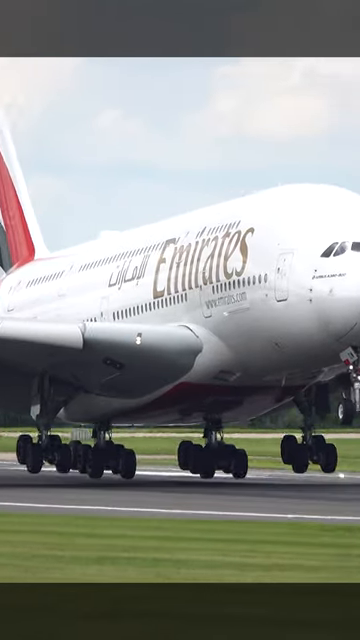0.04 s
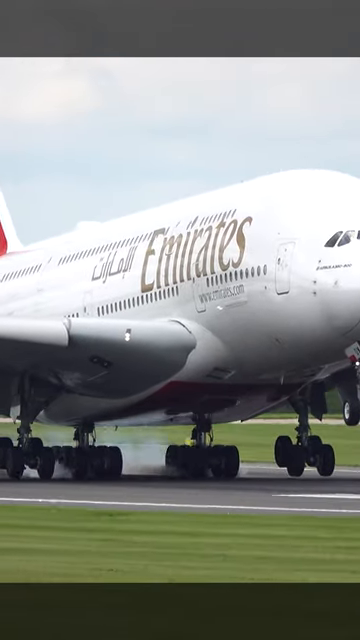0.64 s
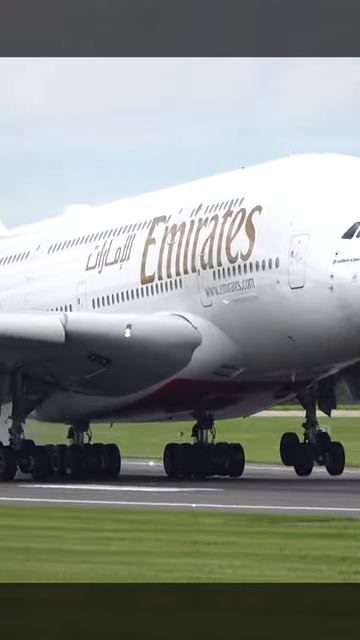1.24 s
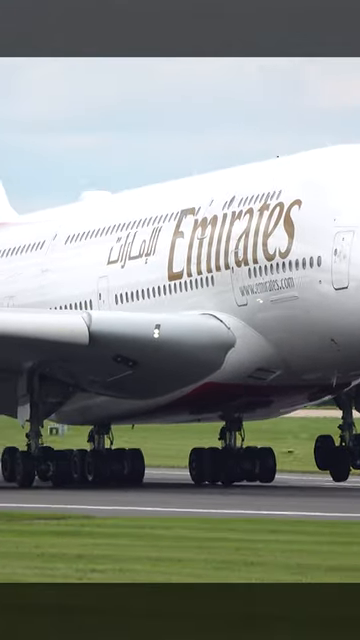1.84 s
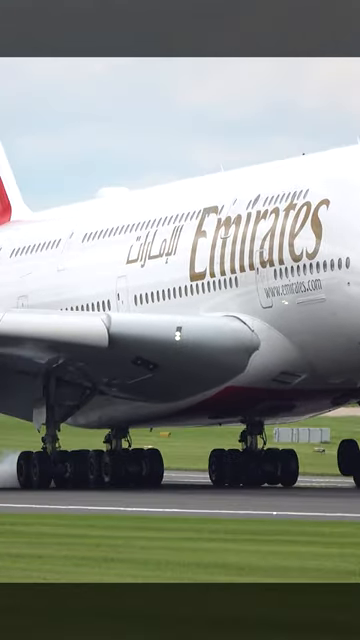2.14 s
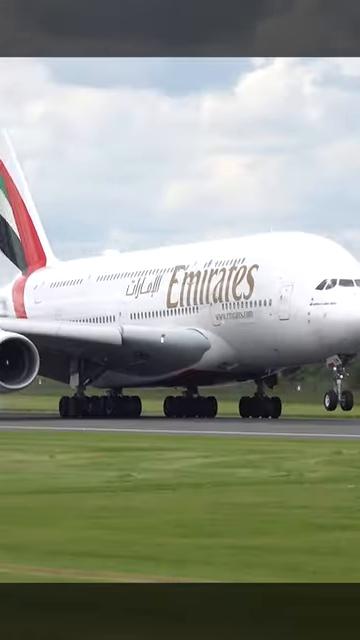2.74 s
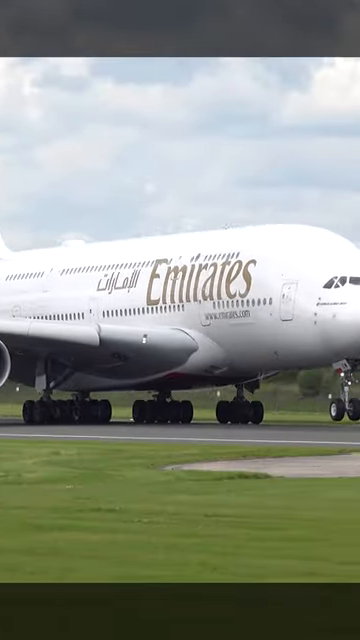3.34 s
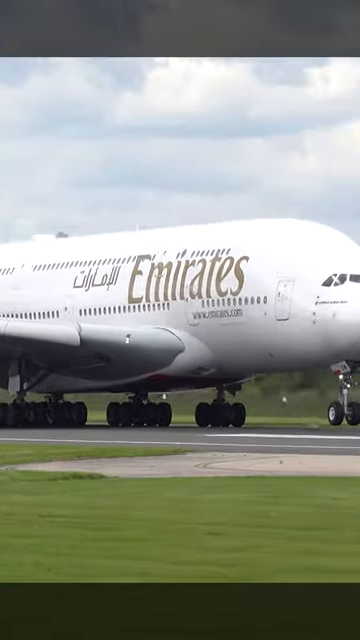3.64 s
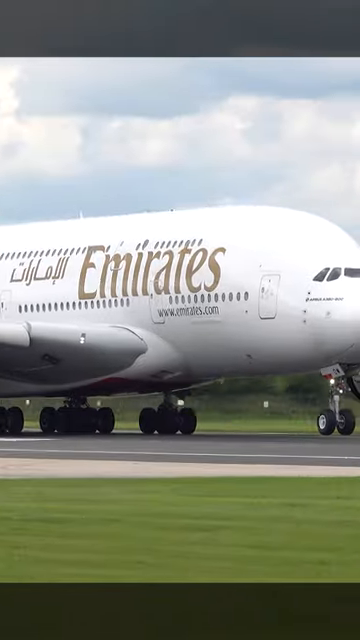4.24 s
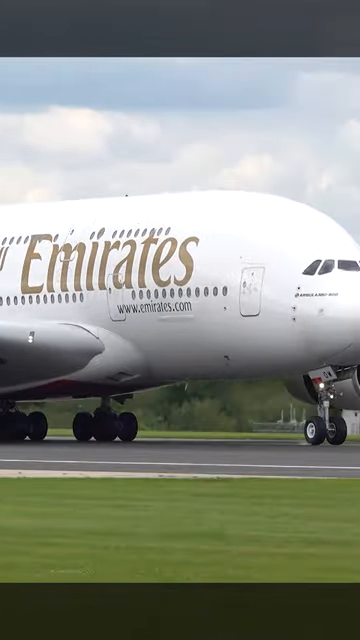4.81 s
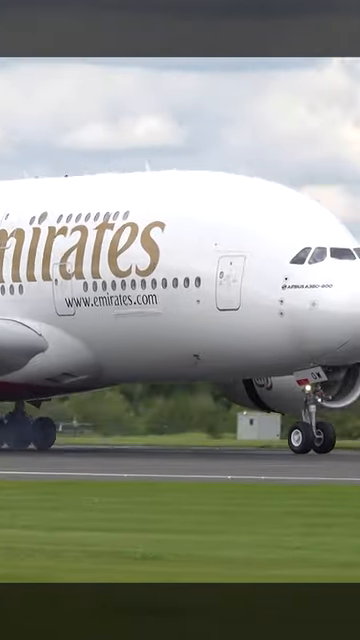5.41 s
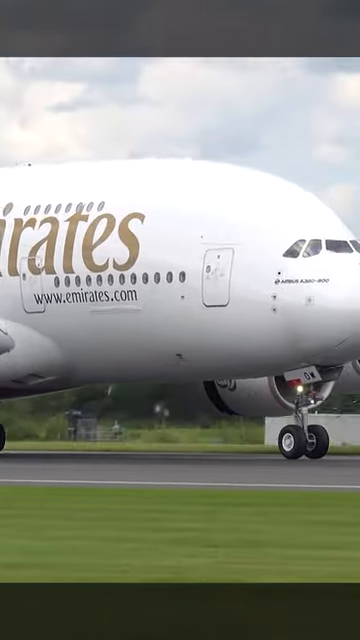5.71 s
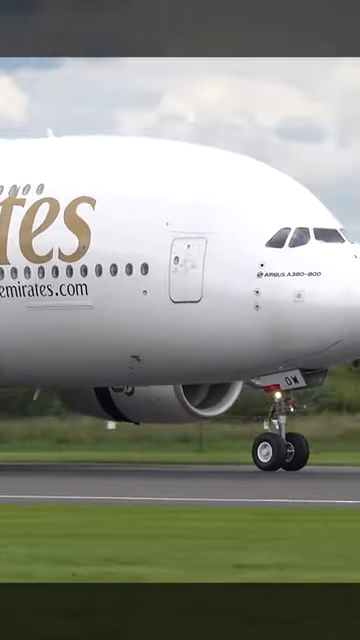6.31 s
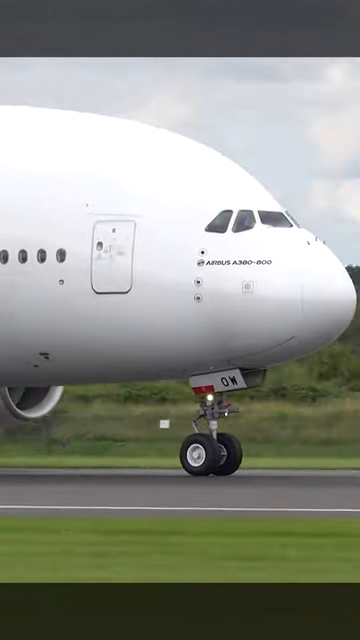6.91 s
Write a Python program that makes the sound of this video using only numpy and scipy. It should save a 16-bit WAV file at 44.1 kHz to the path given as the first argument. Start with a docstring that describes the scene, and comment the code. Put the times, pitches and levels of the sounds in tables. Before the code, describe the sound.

A large jet airliner lands on a runway, heard from across open grass. At first its idling engines whine downward over a low rumble while gusts of wind buffet the microphone. Then reverse thrust builds into a deep roar and a wide rush that brightens as the plane nears. The nose tyres give a brief double rasp, and a few sharp ticks top the loud engine noise.

```python
"""Idling jet fans whine down over a low rumble while gusts of wind buffet the microphone.
A four-engined airliner is landing and rolling closer, heard across grass. Its engines spool up in
reverse thrust: large exhaust eddies swell into a deep roar, and jet turbulence into a wide rush that
brightens as it nears. The nose tyres rasp, sharp ticks top the rush, and the peaks drive a limiter."""
import sys
import numpy as np
from scipy import signal
from scipy.fft import rfft, irfft, next_fast_len
from scipy.io import wavfile
from scipy.ndimage import uniform_filter1d, minimum_filter1d

SR = 44100
rng = np.random.default_rng(int(sys.argv[2]) if len(sys.argv) > 2 else 0)


def to_wav(sig):
    """Store sig (one row per channel, or 1-D mono) as 16-bit WAV at the path in sys.argv[1].

    Samples outside -1..1 are clipped; the rate is SR.
    """
    pcm = np.clip(np.atleast_2d(sig), -1, 1) * 32767
    pcm = np.round(pcm).astype(np.int16)
    wavfile.write(sys.argv[1], SR, pcm.T)  # frames by channels


N = 306936
TIME = np.arange(N) / SR
FRAME, HOP = 1024, 256  # samples
FRAME_S = np.arange(N // HOP + 6) * HOP / SR
BIN_HZ = np.fft.rfftfreq(FRAME, 1 / SR)


def gain_of(db):
    """Decibels to amplitude."""
    return 10 ** (np.asarray(db) / 20)


def unit_rms(x):
    """Scales to rms 1."""
    return x / np.sqrt(np.mean(x ** 2) + 1e-20)


def steadied(x, seconds):
    """Rides the level to hold rms 1 within a sliding window."""
    size = max(int(seconds * SR), 2)
    power = uniform_filter1d(uniform_filter1d(x ** 2, size), size)
    return x / np.sqrt(abs(power) + 1e-20)


def follow(rows, t=TIME):
    """Each column of an automation curve at times t."""
    times, *columns = np.transpose(rows)
    return [np.interp(t, times, column) for column in columns]


def bumps(times, half_lengths, heights, t=TIME):
    """A sum of bell-shaped rises and falls."""
    return sum(h * np.exp(-((t - s) / w) ** 2) for s, w, h in zip(times, half_lengths, heights))


def eq_db(colour, hz):
    """An EQ curve in dB, its points joined on a log-frequency axis."""
    points_hz, db = np.transpose(colour)
    return np.interp(np.log(hz + 1), np.log(points_hz + 1), db)


def noise(colour):
    """Noise of rms 1, shaped by an EQ curve."""
    size = next_fast_len(N)
    hz = np.fft.rfftfreq(size, 1 / SR)
    spectrum = rfft(rng.standard_normal(size)) * gain_of(eq_db(colour, hz))
    return unit_rms(irfft(spectrum, size)[:N])


def varispeed(x, speed):
    """Loops a sound at a changing speed, bending its pitch."""
    return np.interp(np.cumsum(speed), np.arange(N), x, period=N)


def drift(rate_hz):
    """A random wobble of rms 1, with little above the given rate."""
    size = len(FRAME_S)
    hz = np.fft.rfftfreq(size, FRAME_S[1])
    slow = irfft(rfft(rng.standard_normal(size)) / (1 + (hz / rate_hz) ** 2), size)
    return np.interp(TIME, FRAME_S, unit_rms(slow))


def patches(seconds, width_hz):
    """Smooth random blotches over time and frequency, rms 1."""
    field = rng.standard_normal((len(FRAME_S), len(BIN_HZ)))
    over_time = signal.windows.gaussian(len(FRAME_S) // 2, seconds / FRAME_S[1])
    over_pitch = signal.windows.gaussian(len(BIN_HZ) // 2, width_hz / BIN_HZ[1])
    return unit_rms(signal.fftconvolve(field, np.outer(over_time, over_pitch), "same"))


def whine(start, end, first_hz, last_hz, level_db, width_hz, waver=.006, flicker_db=2, fade_s=.055):
    """A gliding tone, smeared into a narrow band by the turbulent air it crosses."""
    hz = np.interp(TIME, [start, end], [first_hz, last_hz]) * (1 + waver * drift(rate_hz=8.34))
    tone = np.exp(2j * np.pi * np.cumsum(hz) / SR)
    low_pass = signal.butter(2, 150, fs=SR)
    scatter = signal.lfilter(*low_pass, drift(width_hz) + 1j * drift(width_hz))
    scatter *= gain_of(flicker_db * drift(rate_hz=8.3))
    outside_s = np.maximum(np.maximum(start - TIME, TIME - end), 0)
    envelope = gain_of(level_db) * np.exp(-outside_s / fade_s)
    return envelope * steadied((tone * scatter).real, seconds=.15)


# Fan blade tones that come through in stretches. Each row: start and end in seconds,
# first and last pitch in Hz, level against the rush in dB, width in Hz.
BLADE_TONES = [(0, 1.298, 1980, 1855, -9, 69), (0, 1.11, 2103, 2068, -11, 70),
               (1.347, 2.053, 1890, 1854, -9, 95), (2.302, 2.55, 1806, 1790, -12, 80),
               (0, 0.334, 3570, 3460, -24.5, 45), (2.68, 3.0, 1705, 1700, -11.5, 75),
               (2.967, 3.17, 3448, 3450, -14, 60), (2.998, 3.447, 2117, 2170, -11, 98),
               (3.17, 3.38, 3530, 3600, -17.5, 45), (3.58, 4.285, 2724, 2815, -13, 80),
               (4.36, 4.62, 2950, 3000, -15.5, 60), (5.147, 6.92, 3330, 3330, -22, 79),
               (5.6, 7, 950, 952, -21, 13)]


def fans():
    """The fans sink to idle, then climb as reverse thrust comes in; their tones grow with the rush."""
    return gain_of(rush_level_db()) * sum(whine(*row) for row in BLADE_TONES)


def distance_m(t, aside_m, speed_m_per_s=72.6, abeam_s=6.94):
    """How far off the engines are, rolling down a straight runway to draw level at abeam_s."""
    return np.hypot(aside_m, speed_m_per_s * (abeam_s - t))


ASIDE_M = 125.5  # from the microphone to the runway
# Idle, then the push into reverse thrust. Each row: time in seconds, rush level at ASIDE_M in dB.
THRUST = [(0, -23.5), (.5, -25), (1.35, -25.5), (2.1, -22), (2.4, -24), (3.58, -20), (3.82, -13.5),
          (4.2, -11), (5.05, -10.5), (5.4, -13.5), (6.25, -12), (6.96, -13)]
# Swells and fades on the way through the air. Each row: centre and half length in seconds,
# change to the rush in dB, change to the roar in dB.
AIR_SWELLS = [(0.507, 0.19, 2, 4), (1.53, .05, -1, 4.5), (4.384, 0.02, 2, -5), (4.744, 0.023, -3.5, 1),
              (5.138, .04, -2, -0.5), (5.41, 0.038, 0.5, 1.5), (5.607, 0.021, 0, 0.5),
              (6.223, .05, 2.5, 0.5), (6.445, 0.027, 1.5, 8)]


def rush_level_db():
    """The fader for the rush: up with thrust, down with distance, nudged by the air."""
    thrust_db, = follow(THRUST)
    spreading_db = 20 * np.log10(distance_m(TIME, ASIDE_M) / ASIDE_M)
    centre_s, half_s, rush_db, _ = np.transpose(AIR_SWELLS)
    return thrust_db - spreading_db + bumps(centre_s, half_s, rush_db)


# The band of the rush that the ground bounce lifts. Each row: time in seconds, centre in Hz, lift in dB.
GROUND_LIFT = [(0, 890, 0), (1.2, 1000, 0), (1.65, 1093, 2.5), (2.2, 1100, -1), (2.6, 600, 0.5),
               (4.1, 680, 1.5), (4.65, 740, 6.5), (5.1, 810, 5.5), (5.3, 826, 1), (5.7, 900, .5),
               (6.1, 865, 5), (6.96, 800, 2)]


def ground_bounce_db(width_octaves=.34, dip_share=.63):
    """Direct and reflected sound add in one broad band and partly cancel an octave below."""
    centre_hz, lift_db = follow(GROUND_LIFT, FRAME_S[:, None])
    octaves = np.log2((BIN_HZ + 1) / centre_hz)
    crest, notch = (np.exp(-.5 * (o / width_octaves) ** 2) for o in (octaves, octaves + 1))
    return lift_db * (crest - dip_share * notch)


# The tone of the jet rush close by. Each row: frequency in Hz, relative level in dB.
RUSH_EQ = [(100, -11), (300, -4.5), (420, -2.5), (580, -1), (1100, -1.5), (1650, -2), (2350, -5.5),
           (3300, -4), (3620, -7), (4050, -18), (4500, -22), (5100, -23), (7000, -36), (9000, -52.5),
           (12000, -69.5)]
# The rush briefly brightens or dulls. Each row: centre and half length in seconds, treble change in dB.
TREBLE_FLARES = [(3.2, 0.36, 3), (3.8, 0.13, 1.5), (5.61, 0.026, -9), (6.227, 0.064, 4), (6.55, 0.021, 5.5)]


def rush(close_m=128, air_db_per_m=.0022, shelf_hz=3500, patchy_db=.85, flutter_db=.5, sway_db=.5):
    """Turbulent jet noise, dulled by the air and made to flutter by eddies on the way."""
    t = FRAME_S[:, None]
    # air absorbs with the square of frequency; air_db_per_m holds at 1 kHz
    absorbed_db = air_db_per_m * (distance_m(t, ASIDE_M) - close_m) * (BIN_HZ / 1000) ** 2
    colour_db = eq_db(RUSH_EQ, BIN_HZ) - absorbed_db + ground_bounce_db()
    treble_shelf = BIN_HZ ** 2 / (BIN_HZ ** 2 + shelf_hz ** 2)
    colour_db += bumps(*np.transpose(TREBLE_FLARES), t) * treble_shelf
    colour_db += patchy_db * patches(seconds=.017, width_hz=95)
    real, imag = rng.standard_normal((2,) + colour_db.shape)
    spectra = (real + 1j * imag) * gain_of(colour_db)
    jet = signal.istft(spectra.T, nperseg=FRAME, noverlap=FRAME - HOP)[1][:N]
    eddies_db = flutter_db * drift(rate_hz=58) + sway_db * drift(rate_hz=22)
    return gain_of(rush_level_db() + eddies_db) * steadied(jet, seconds=.36)


# The bed of breeze on the microphone. Each row: time in seconds, level in dB.
BREEZE = [(0, -32), (1.55, -29), (1.8, -37), (2.2, -30.5), (5.2, -32), (5.9, -42), (6.96, -43)]
# Gusts on top of the breeze. Each row: centre and half length in seconds, lift in dB.
GUSTS = [(.49, 0.052, 7.5), (0.946, 0.026, 12), (1.283, 0.084, 12), (2.13, 0.14, 9), (2.421, 0.1, 5.5),
         (3.063, 0.27, 8), (4.001, 0.061, 7), (5.068, 0.065, 8.5)]
# The wind's rumble between gusts. Each row: frequency in Hz, relative level in dB.
WIND_EQ = [(8, -25.5), (20, 3), (40, 10.5), (65, 4), (110, -9.5), (180, -13), (280, -15), (500, -38),
           (1500, -78.5)]


def wind(lumpy_db=1.2, slowing_per_db=.0068):
    """Lumpy eddies buffet the microphone; each gust is louder and a touch deeper."""
    breeze_db, = follow(BREEZE)
    gust_db = bumps(*np.transpose(GUSTS))
    eddies = varispeed(noise(WIND_EQ), 1 - slowing_per_db * gust_db)
    level_db = breeze_db + gust_db + lumpy_db * drift(rate_hz=30)
    return gain_of(level_db) * steadied(eddies, seconds=.047)


# The fader for the deep exhaust roar. Each row: time in seconds, level in dB.
ROAR_LEVEL = [(0, -32), (.75, -32), (1.25, -25.5), (1.6, -28.5), (1.82, -35.5), (2.05, -31.5), (2.8, -26),
              (3.3, -22.5), (3.85, -14), (4.8, -13.5), (5.5, -12), (6.3, -19), (6.96, -15)]
# The roar's tone before its pitch bend. Each row: frequency in Hz, relative level in dB.
ROAR_EQ = [(20, -41), (45, -19), (75, -0.5), (115, 0.5), (165, -1), (200, -7), (250, -16), (330, -22.5),
           (450, -41), (900, -86.5)]
# The roar's pitch bend. Each row: time in seconds, factor on its frequencies.
ROAR_BEND = [(0, 0.7), (.7, 0.74), (1.25, .97), (3.2, 1.006), (4.4, .95), (5.3, 1.07), (6, .95),
             (6.96, .97)]
# Under reverse thrust part of the roar gathers into a drone. One row: start and end in seconds,
# first and last pitch in Hz, level against the roar's noise in dB, width in Hz.
REVERSE_DRONE = (3.5, 7, 163, 155, -7, 20.5)


def roar(throb_db=.8):
    """Large exhaust eddies: the bass that carries over soft ground and swells in reverse thrust."""
    level_db, = follow(ROAR_LEVEL)
    bend, = follow(ROAR_BEND)
    centre_s, half_s, _, swell_db = np.transpose(AIR_SWELLS)
    eddies = varispeed(noise(ROAR_EQ), bend) + whine(*REVERSE_DRONE)
    level_db += bumps(centre_s, half_s, swell_db) + throb_db * drift(rate_hz=29)
    return gain_of(level_db) * steadied(eddies, seconds=.07)


# The thin, bright tone of the crackle. Each row: frequency in Hz, relative level in dB.
CRACKLE_EQ = [(1000, -30), (5500, 1), (9000, -8), (15000, -8)]


def crackle(centre_s=1.4, half_s=.53, level_db=-73, uneven_db=6):
    """A very faint, scratchy fizz around the strongest gust."""
    grains = unit_rms(gain_of(uneven_db * np.clip(drift(rate_hz=60), -2, 2)))
    return bumps([centre_s], [half_s], [gain_of(level_db)]) * grains * noise(CRACKLE_EQ)


# Sharp ticks on top of the loud rush. Each row: start in seconds, level in dB before filtering.
LOUD_TICKS = [(4.715, -29), (5.183, -19), (5.448, -28), (5.876, -23), (5.905, -23), (6.092, -24),
              (6.31, -28), (6.339, -16.5), (6.391, -24), (6.498, -26), (6.584, -19), (6.814, -19),
              (6.899, -14)]


def ticks(most_per_s=130, faint_db=-40, spread_db=3, stereo_spread=.4, decay_s=.00009):
    """Tiny sharp clicks: a few loud ones, and faint ones that crowd in as the rush grows loud."""
    rush_db = rush_level_db()
    chance = most_per_s / SR * gain_of(rush_db - rush_db.max()) ** 2
    sizes = gain_of(faint_db + spread_db * np.clip(rng.standard_normal(N), -2, 2))
    sizes *= rng.choice([-1, 1], N)
    clicks = (rng.random(N) < chance) * sizes * (1 + stereo_spread * rng.standard_normal((2, N)))
    start_s, loud_db = np.transpose(LOUD_TICKS)
    clicks[:, np.round(start_s * SR).astype(int)] += gain_of(loud_db)
    # each click rises over two samples, which dulls its very top, then dies away
    return signal.lfilter([1, .55], [1, -np.exp(-1 / (decay_s * SR))], clicks)


# The nose tyres scrub as they spin up. Each row: centre and half length in seconds, level in dB.
TYRE_SCRUBS = [(4.969, .016, -13.5), (5.008, .013, -17)]
# The midrange rasp of the rubber. Each row: frequency in Hz, relative level in dB.
TYRE_EQ = [(300, -29), (700, 0), (1000, -4), (1550, -2), (2000, -26), (4000, -38), (8000, -80)]


def tyres():
    """A short double rasp as the nose wheels meet the runway."""
    centre_s, half_s, level_db = np.transpose(TYRE_SCRUBS)
    return bumps(centre_s, half_s, gain_of(level_db)) * noise(TYRE_EQ)


def scene(bass_left_db=.72):
    """The mix: the airliner sits in the centre, with roar and wind leaning slightly left."""
    lean = gain_of(np.array([[.5], [-.5]]) * bass_left_db)
    bass = (roar() + wind()) * lean
    return bass + rush() + fans() + tyres() + crackle() + ticks()


def limiter(x, ceiling, release_db_per_s, attack_samples=45):
    """Turns down just ahead of each peak and recovers smoothly."""
    over_db = np.maximum(20 * np.log10(abs(x).max(0) / ceiling + 1e-9), 0)
    release_db = TIME * release_db_per_s
    gain_db = release_db - np.maximum.accumulate(over_db + release_db)
    held_db = minimum_filter1d(gain_db, 2 * attack_samples)
    smooth_db = uniform_filter1d(uniform_filter1d(held_db, attack_samples), attack_samples)
    return x * gain_of(smooth_db)


# The tone of the microphone's own hiss. Each row: frequency in Hz, relative level in dB.
HISS_EQ = [(100, -11.5), (3000, -11.5), (5000, -1.5), (7000, 0), (11000, -3.5), (16000, -6)]


def record(dry, cutoff_hz=15830, fade_in_s=.004):
    """The master chain: microphone hiss, peak limiter, a quick fade-in and a steep low-pass."""
    centre_hiss = noise(HISS_EQ)
    wide_hiss = np.array([noise(HISS_EQ), noise(HISS_EQ)])
    hiss = gain_of(-74.5) * (centre_hiss + .65 * wide_hiss)
    limited = limiter(dry + hiss, ceiling=.84, release_db_per_s=118.5)
    fade_in = np.minimum(TIME / fade_in_s, 1)
    low_pass = signal.firwin(511, cutoff_hz, window=("kaiser", 9), fs=SR)
    return signal.oaconvolve(limited * fade_in, low_pass[None], "same")


dry = scene()
out = record(dry)
to_wav(out)
```